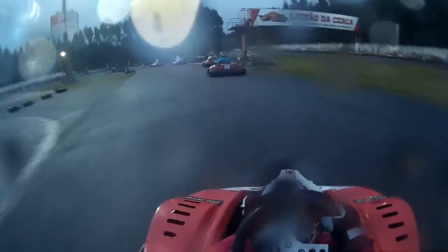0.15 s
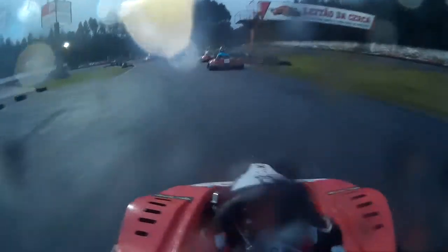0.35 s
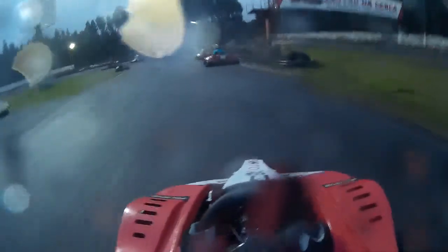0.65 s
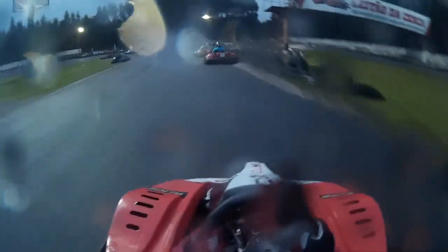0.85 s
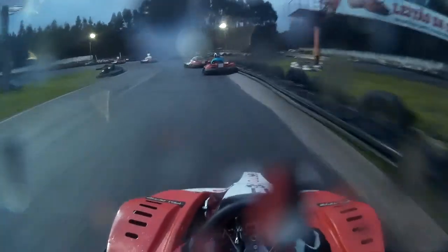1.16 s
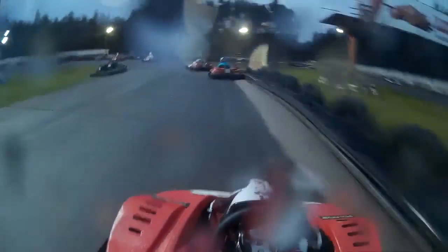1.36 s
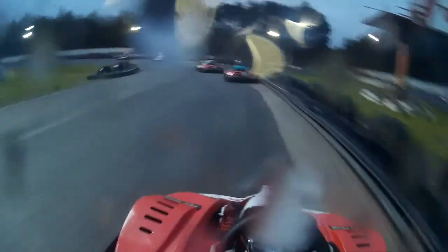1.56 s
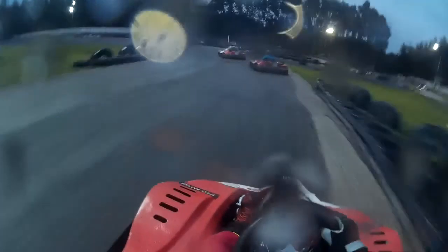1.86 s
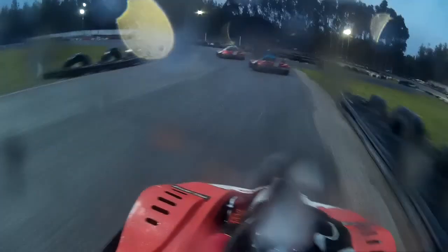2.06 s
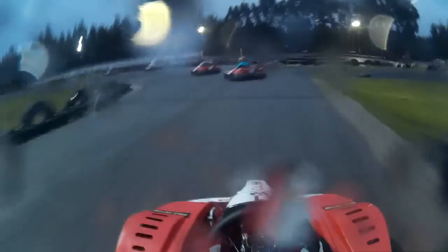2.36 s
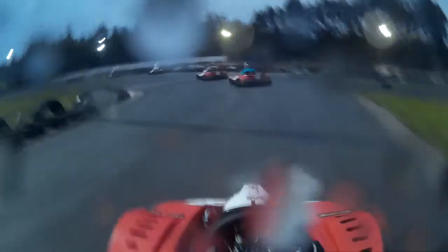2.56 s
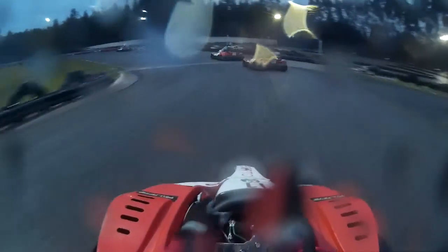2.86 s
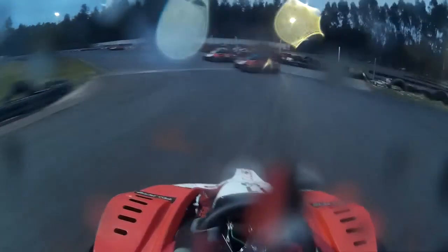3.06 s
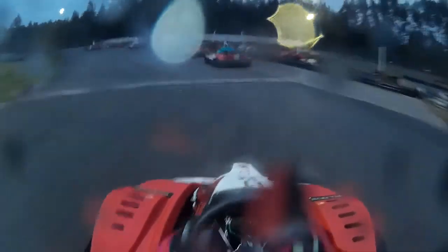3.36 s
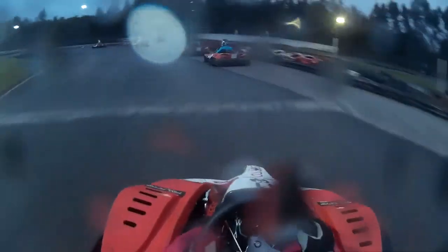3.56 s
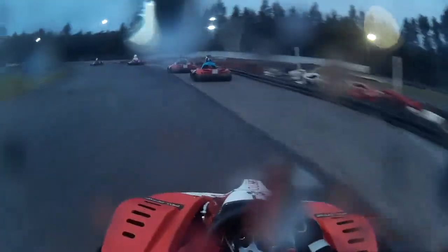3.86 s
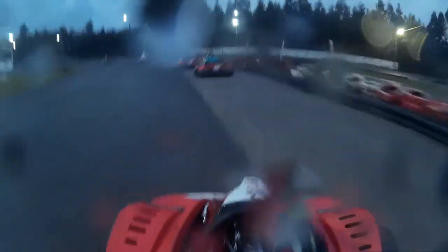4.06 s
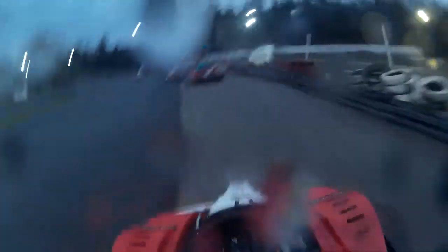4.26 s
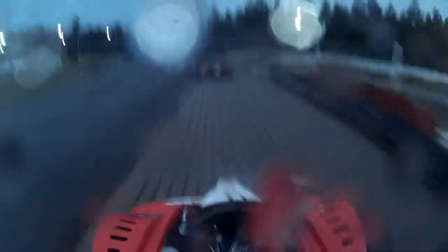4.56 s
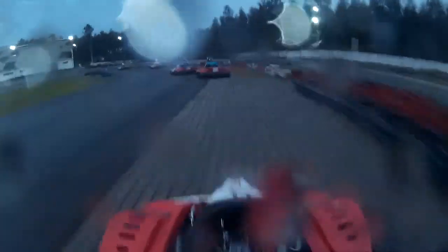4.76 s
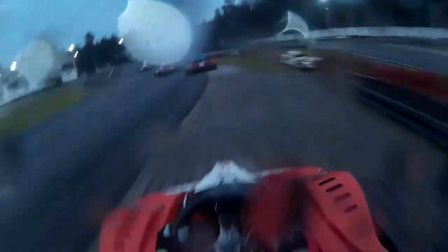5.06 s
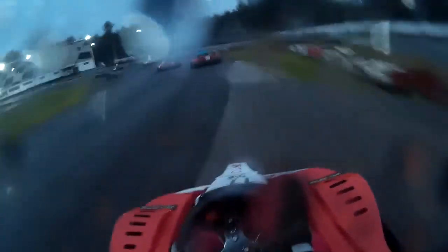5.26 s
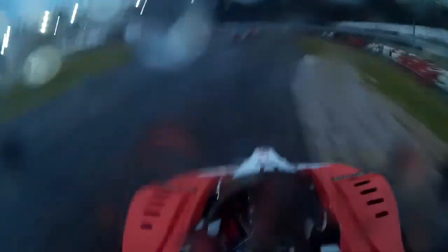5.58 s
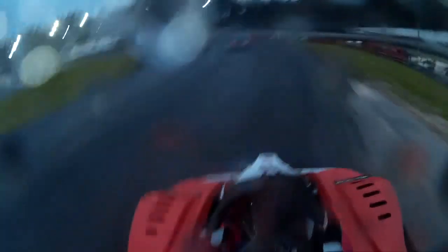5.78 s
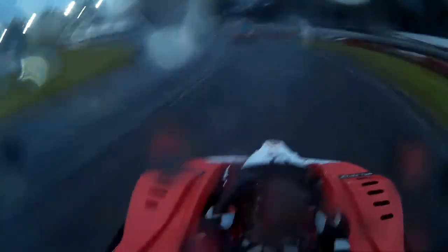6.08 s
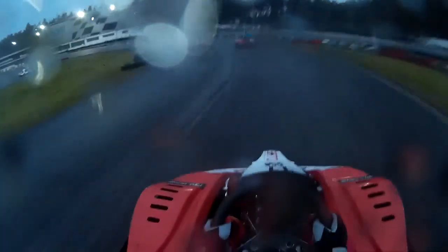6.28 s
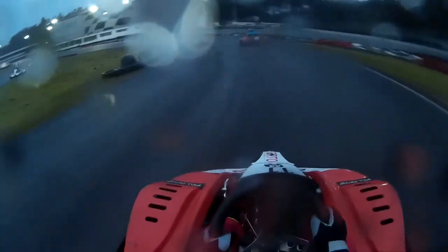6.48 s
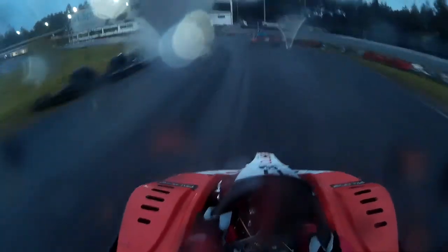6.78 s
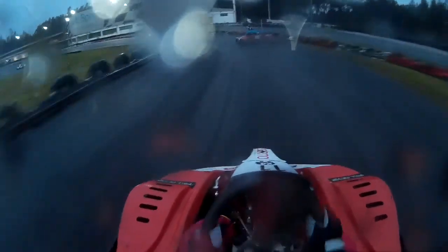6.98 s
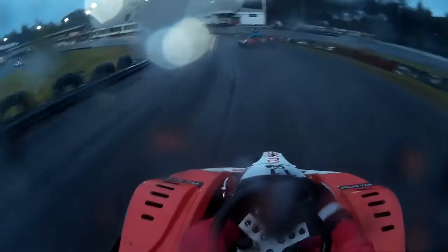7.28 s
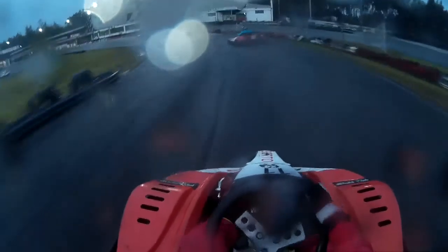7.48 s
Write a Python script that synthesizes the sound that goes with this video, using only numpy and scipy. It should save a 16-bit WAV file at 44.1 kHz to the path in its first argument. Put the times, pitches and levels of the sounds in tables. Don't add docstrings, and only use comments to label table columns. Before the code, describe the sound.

On board a kart on a wet track: rough single-cylinder buzzing, coasting lulls, chain whine, metallic rattles, and a long full-throttle pull.

```python
import sys
import numpy as np
from scipy import signal
from scipy.fft import rfft, irfft
from scipy.io import wavfile
from scipy.ndimage import uniform_filter1d

SR = 44100
rng = np.random.default_rng(int(sys.argv[2]) if len(sys.argv) > 2 else 0)


def pcm_store(signal):
    levels = np.round(np.clip(np.atleast_2d(signal), -1, 1) * 32767)
    wavfile.write(sys.argv[1], SR, levels.astype(np.int16).T)


def nominal_scale(level):
    x = np.asarray(level, float) / 20
    return 10 ** x


N = 336483
TIME = np.arange(N) / SR


def evened(x):
    return x / np.sqrt(np.mean(x ** 2) + 1e-20)


def coloured(spectrum, band=(1000, 2200)):
    hz = np.fft.rfftfreq(N, 1 / SR)
    f, db = np.transpose(spectrum)
    z = rfft(rng.standard_normal(N)) * nominal_scale(np.interp(np.log(hz + 1), np.log(f), db))
    inside = (hz > band[0]) & (hz < band[1])
    return irfft(z, N) * N / np.sqrt(2 * np.sum(abs(z[inside]) ** 2))


def drift(seconds):
    span = max(round(seconds * SR), 2)
    smooth = uniform_filter1d(rng.standard_normal(N), span)
    return evened(uniform_filter1d(smooth, span))


def between(shut_open, throttle):
    shut, opened = shut_open
    return shut + (opened - shut) * throttle


def train(at, size):
    return np.bincount(np.clip(at, 0, N - 1), size, N)


def puff(clicks, rise, t60):
    t = TIME[:6000]
    envelope = (1 - np.exp(-t / rise)) * nominal_scale(-60 * t / t60)
    return signal.oaconvolve(clicks, envelope)[:N]


def rung(modes, at, size, spread_db, rise):
    t, out = TIME[:4000], np.zeros(N)
    luck = nominal_scale(spread_db * rng.standard_normal((len(at), len(modes))))
    for k, (hz, db, t60) in enumerate(modes):
        decay = nominal_scale(db - 60 * t / t60) * (1 - np.exp(-t / rise))
        ring = (-1) ** k * decay * np.sin(2 * np.pi * hz * t)
        out += signal.oaconvolve(train(at, size * luck[:, k]), ring)[:N]
    return out


# t/s, firing rate/Hz
FIRING_RATE = [(0.0, 29.874), (0.55, 25.363), (0.68, 26.581), (1.9, 25.579), (2.75, 28.023), (2.93, 24.533),
               (3.4, 23.189), (4.22, 26.387), (4.31, 27.583), (4.66, 26.719), (4.89, 27.637),
               (4.98, 26.407), (5.62, 27.981), (6.1, 29.932), (6.2, 29.955), (6.64, 32.724), (6.93, 29.501),
               (7.63, 29.979)]


def firing_rate():
    return np.interp(TIME, *np.transpose(FIRING_RATE))


# start t/s, throttle at start/0-1, throttle at end/0-1
PEDAL_MOVES = [(0, 1, 0.9), (.362, 0.6, .4), (.40, .05, 0), (.662, 0.8, 0.98), (.78, 0.3, 0.25),
               (0.826, 0.61, .45), (.93, 0.03, 0), (1.94, 0.03, 0.54), (2.198, 0.57, 0.6), (2.242, 0.94, 1),
               (2.612, 0.81, 0.87), (2.75, 0.92, 0.84), (2.79, 0.37, 0.19), (2.98, 0, 0), (3.33, 0, 0.2),
               (3.612, 0.72, 0.51), (3.942, 0.95, 1.02), (5.202, 1, 0.91), (6.101, 0.98, 1.0),
               (6.71, 0.54, 0.1), (6.9, 0.2, 0.07), (7.3, 0, 0.24), (7.442, 1, 0.98)]


def pedal():
    start, first, last = np.transpose(PEDAL_MOVES)
    move = np.maximum(np.searchsorted(start, TIME, side="right") - 1, 0)
    done = (TIME - start[move]) / np.diff(start, append=N / SR)[move]
    opening = first[move] + (last - first)[move] * done
    return uniform_filter1d(opening, round(.02 * SR))


# f/Hz, spectral level/dB per Hz
WIND_SPECTRUM = [(20, -11), (35, -11), (60, 3.5), (110, -3), (200, -7.5), (400, -24), (1000, -48),
                 (2200, -63)]


def wind():
    return nominal_scale(-43.5 + 1.63 * drift(0.076)) * coloured(WIND_SPECTRUM, band=(20, 2200))


# f/Hz, spectral level/dB per Hz
TYRE_SPECTRUM = [(100, -28), (250, -11), (550, -11), (900, -8), (1300, -1), (2000, -10), (2600, -26),
                 (4500, -37.5), (7000, -45.5), (11000, -53), (16000, -61)]


def tyres(turns, roar_db):
    throb_db = 0.57 * np.cos(2 * np.pi * (turns + 0.014))
    gust_db = 0.13 * drift(0.078) + 0.91 * drift(0.0063)
    return nominal_scale(roar_db + throb_db + gust_db) * coloured(TYRE_SPECTRUM)


# f/Hz, spectral level/dB per Hz
METAL_SPECTRUM = [(700, 1), (1300, 6.5), (2500, -10), (4000, -19), (6000, -31), (8500, -34), (12000, -38),
                  (16000, -51.5)]
# f/Hz, level/dB, t60/s
PANEL_MODES = [(1123, 7.5, 0.033), (1877, 2, 0.032), (2906, -14, 0.049), (4130, -21.5, 0.052),
               (4750, -36, 0.016), (5540, -21.5, 0.027), (7340, -25.5, 0.027), (7700, -31.5, .025),
               (10800, -35, .02)]
# first t/s, last t/s, taps/count
TAP_BURSTS = [
    (1.149, 1.391, 7),
    (1.743, 1.823, 3),
    (2.879, 2.958, 2),
    (3.073, 3.312, 7),
    (3.352, 3.539, 6),
    (3.577, 3.615, 2),
    (7.031, 7.364, 11),
]
# first level/dB, last level/dB
TAP_LEVELS = [
    (-52, -56),
    (-47.5, -47.5),
    (-50.5, -52.5),
    (-51, -50),
    (-45, -48.5),
    (-47.5, -45),
    (-51, -47.5),
]


def clatter():
    s = np.concatenate([np.linspace(*burst) for burst in TAP_BURSTS])
    levels = zip(TAP_LEVELS, TAP_BURSTS)
    db = np.concatenate([np.linspace(*ends, burst[2]) for ends, burst in levels])
    late, strength = rng.standard_normal((len(s), 2)).T
    at = np.round((s + .0015 * late) * SR).astype(int)
    db = db + 2.5 * strength
    contact = puff(train(at, nominal_scale(db + 12.5)), rise=0.00049, t60=0.11) * coloured(METAL_SPECTRUM)
    return contact + rung(PANEL_MODES, at, nominal_scale(db + 16), spread_db=3.5, rise=0.00057)


# t/s, level/dB, frame f/Hz, seat knock level/dB (re frame), seat knock f/Hz
SEAM_BUMPS = [(1.678, -30, 63, -8, 285), (2.402, -31, 61, -9, 285), (3.043, -40, 51.1, -15, 287),
              (4.29, -45, 60, 8, 470), (4.466, -26, 57.4, -14, 248), (4.849, -31, 71, -15, 285),
              (5.439, -34, 50.4, -7, 283), (5.487, -26.5, 81, -3, 296), (5.613, -35, 61.9, -3, 283),
              (5.835, -35, 67.3, -2, 260), (5.901, -32, 107, 0, 282)]


def bumps():
    out = np.zeros(N)
    for s, db, hz, knock_db, knock_hz in SEAM_BUMPS:
        t = np.maximum(TIME - s, 0)
        seat = sum(np.sin(2 * np.pi * share * knock_hz * t) for share in (.62, 1, 1.3))
        knock = seat * nominal_scale(knock_db - 60 * t / 0.21)
        swing = np.sin(2 * np.pi * hz * t)
        out += nominal_scale(db + 9.0 - 60 * t / 0.15) * (1 - np.exp(-t / 0.016)) * (swing + knock)
    return out


def chain(turns, whine_db):
    teeth_per_firing, loop_firings, loop_hz, tight_s = 27.75, 6.2, 14.1, 4.53
    loop = (turns - np.interp(tight_s, TIME, turns)) / loop_firings
    speed = np.gradient(turns) * SR
    mesh_hz = teeth_per_firing * speed + 12.0 * np.maximum(25.6 - speed, 0)
    taut = np.clip((mesh_hz - 750) / 80, 0, 1)
    mesh_hz = mesh_hz + loop_hz * (1 - taut) * np.cos(2 * np.pi * loop)
    jitter = (.11 - .07 * taut) * drift(.015)
    teeth = np.cos(2 * np.pi * (np.cumsum(mesh_hz) / SR + jitter))
    tug_db = 0.15 * np.cos(2 * np.pi * (turns - .03))
    taut_db = 4 * taut * np.clip((whine_db + 53) / 5, -1, 1)
    flutter_db = 2.95 * (1 - taut) * drift(0.0042)
    return np.sqrt(2) * nominal_scale(whine_db - 4.0 + taut_db + tug_db + flutter_db) * teeth


# t/s, lift level/dB, half length/s
FRAME_SHUDDERS = [(.28, 10, 0.13), (0.577, 4, 0.09), (.76, 8, 0.053), (1.0, 5.5, .1), (1.6, 4.5, 0.18),
                  (2.3, 3, .1), (2.8, 5, 0.061), (3.45, 5, .3), (4.0, 9, 0.073), (4.56, 4, .1),
                  (5.45, 3, .12), (6.3, 9, 0.11), (6.52, 3, .1), (6.92, 6, 0.17), (7.2, 2.5, 0.14)]


def crank_shake(turns, throttle):
    lift_db = sum(db * np.exp(-((TIME - s) / half) ** 2) for s, db, half in FRAME_SHUDDERS)
    shake_db = between((-43.5, -42), throttle) + lift_db
    swing = np.cos(2 * np.pi * (2 * turns + 0.032 * drift(.12) + 0.08))
    return np.sqrt(2) * nominal_scale(shake_db - 3.5 + 3.4 * drift(0.1)) * swing


# f/Hz, level/dB, t60/s
PIPE_MODES = [(126, -4.5, 0.072), (192.7, -0.5, 0.052), (335, -2.5, 0.032), (417, 6, 0.031),
              (600, 3, 0.024), (698, 2.5, 0.067), (905, -3, 0.1)]


def pipe(fired, flame, speed, thump_db):
    thump = nominal_scale(thump_db + 4.5)
    sink = nominal_scale(0.88 * np.minimum(thump_db + 27.5, 0))
    excess = speed - 27
    lowest = thump * nominal_scale(-1.2 * excess) / sink ** 0.49
    second = thump * nominal_scale(0.83 * excess) / sink ** 0.19
    boom = rung(PIPE_MODES[:1], fired, lowest, spread_db=1.2, rise=0.001)
    boom -= rung(PIPE_MODES[1:2], fired, second, spread_db=0.7, rise=.0008)
    return boom + rung(PIPE_MODES[2:], fired, thump * sink, spread_db=.5, rise=.0008)


# f/Hz, level/dB, t60/s
SHELL_MODES = [(1100, -8.5, 0.01), (1201.6, 5, 0.04), (1347.7, -2.5, 0.061), (1550, 0, 0.015),
               (1721, 0, 0.034), (2150, -7, 0.011)]


def silencer(flame, bark):
    shell = nominal_scale(-1.2) * rung(SHELL_MODES, flame, bark, spread_db=2.5, rise=0.0011)
    back = flame + round(0.003002 * SR)
    return shell + nominal_scale(-5.0) * rung(SHELL_MODES, back, bark, spread_db=5.5, rise=0.00033)


# f/Hz, spectral level/dB per Hz
GAS_SPECTRUM = [(500, -37), (900, -15), (1300, -1.5), (2000, 0), (2600, -11.5), (4500, -25), (6500, -35),
                (11500, -43.5), (12400, -56), (16000, -53)]


def gas_jet(flame, bark, gust):
    outflow = train(flame, bark * nominal_scale(0.62 * gust))
    flow = puff(outflow, rise=0.0014, t60=0.07) + nominal_scale(-16.5) * puff(outflow, rise=0.002, t60=0.17)
    return nominal_scale(-8.0) * flow * nominal_scale(1.83 * drift(0.0036)) * coloured(GAS_SPECTRUM)


def exhaust(turns, bark_db, thump_db):
    fired = np.flatnonzero(np.diff(np.floor(turns + .12)) > 0)
    late, strength, gust = rng.standard_normal((len(fired), 3)).T
    flame = fired + np.round(.0002 * SR * late).astype(int)
    weak_db = .45 * np.minimum(bark_db[fired] + 26, 0)
    bark = nominal_scale(bark_db[fired] + .9 * strength + weak_db)
    speed = np.gradient(turns)[fired] * SR
    rattle = nominal_scale(-23) * rung(PANEL_MODES[2:], flame, bark, spread_db=4.5, rise=0.0012)
    ringing = silencer(flame, bark) + pipe(fired, flame, speed, thump_db[fired])
    return ringing + rattle + gas_jet(flame, bark, gust)


def scene():
    speed, throttle = firing_rate(), pedal()
    turns = .26 + np.cumsum(speed) / SR
    stumble_db = between((3.5, .6), np.minimum(throttle, 1)) * drift(0.067)
    pop_db = 8 * (abs(TIME - .68) < .018)
    bark_db = between((-35.5, -17.5), throttle) + stumble_db + pop_db
    thump_db = between((-40, -30), np.minimum(throttle / 0.99, 1)) + 0.43 * stumble_db
    rolling = uniform_filter1d(throttle, round(.09 * SR))
    pull = np.minimum(rolling / 0.51, 1)
    whine_db = between((-53, -35.5), pull) + between((5.0, 1.5), pull) * drift(.07)
    whine_db -= 2.7 * np.maximum(speed - 27.1, 0)
    whine_db -= 25 * np.maximum(23.9 - speed, 0)
    surroundings = wind() + tyres(turns, between((-35.5, -30.5), rolling)) + clatter() + bumps()
    kart = chain(turns, whine_db) + crank_shake(turns, throttle) + exhaust(turns, bark_db, thump_db)
    return (surroundings + kart)[None]


# f/Hz, width/Hz, lift level/dB
HOUSING_POCKETS = [(510, 110, -1.5), (888, 89, -5), (1332, 70, 1.5), (1670, 90, -3.5), (2682, 72, -8),
                   (2706, 250, 3), (3120, 530, 4.5), (3450, 250, -8), (4030, 240, 9), (4370, 390, -0.5),
                   (5660, 290, 3.5), (6100, 120, -4.5), (7840, 530, 6.5), (9250, 200, -2), (9500, 80, 1.5),
                   (10800, 410, 3), (16200, 1600, -3)]


def housing(x):
    hz = abs(np.fft.fftfreq(4096, 1 / SR))
    lift_db = sum(db / (1 + (2 * (hz - f) / width) ** 2) for f, width, db in HOUSING_POCKETS)
    log_response = np.conj(signal.hilbert(np.log(nominal_scale(lift_db))))
    impulse = np.fft.ifft(np.exp(log_response)).real[:2048]
    return signal.oaconvolve(x, impulse[None], axes=1)[:, :N]


def roll_off(x):
    return signal.sosfilt(signal.butter(12, 15750, fs=SR, output="sos"), x)


def record(dry):
    hissed = dry + nominal_scale(-70.5) * rng.standard_normal(dry.shape)
    mix = housing(hissed)
    return roll_off(mix)


dry = scene()
out = record(dry)
pcm_store(out)
```